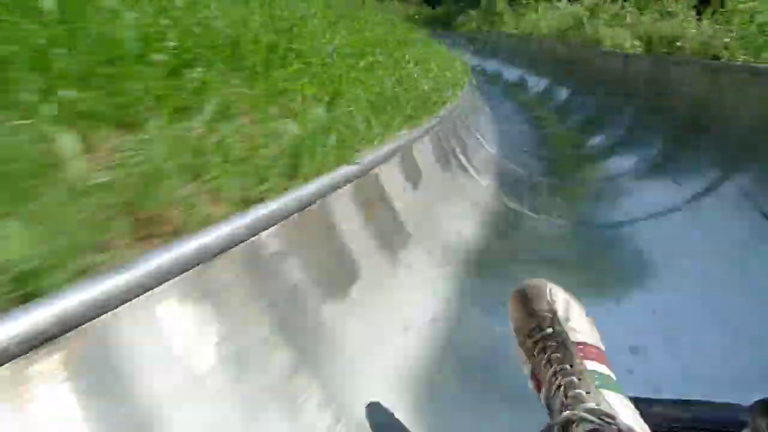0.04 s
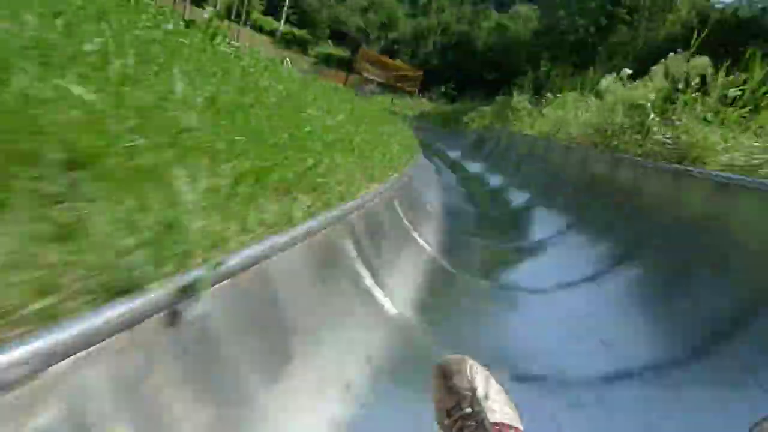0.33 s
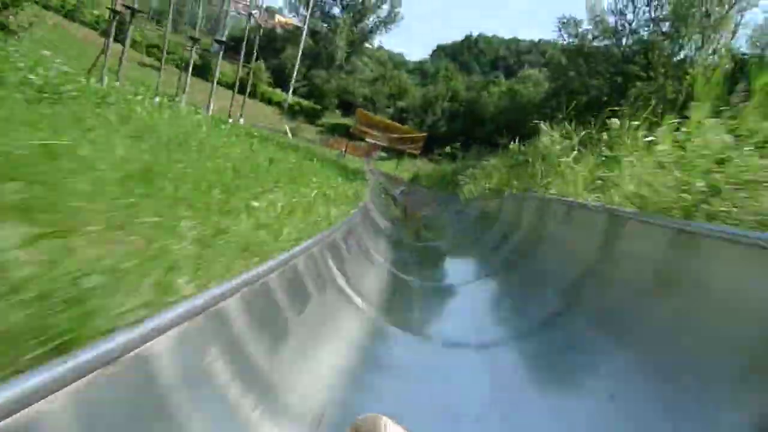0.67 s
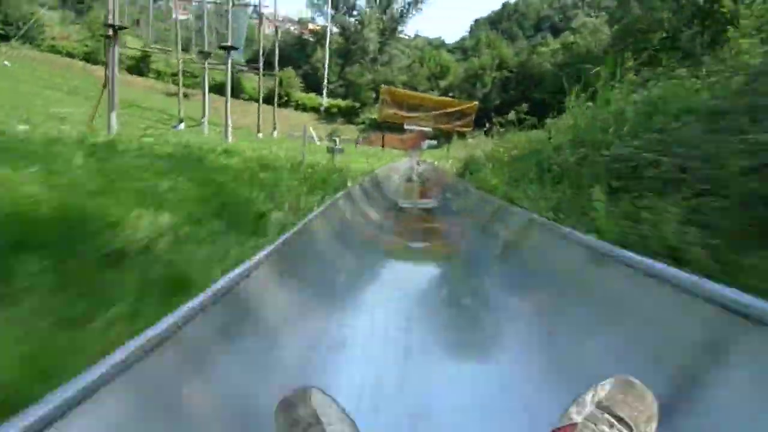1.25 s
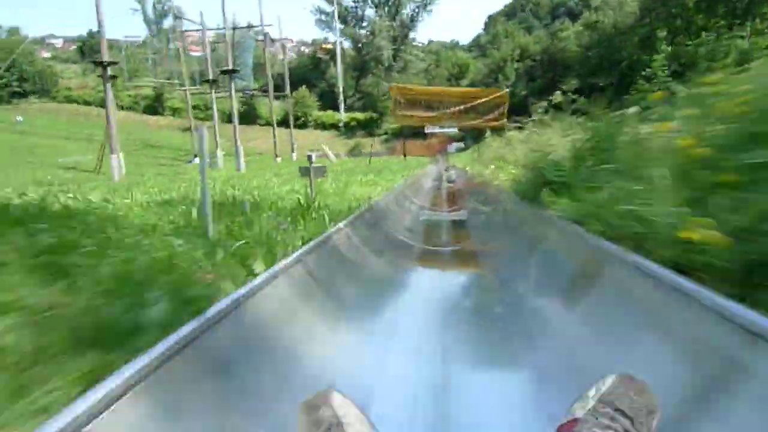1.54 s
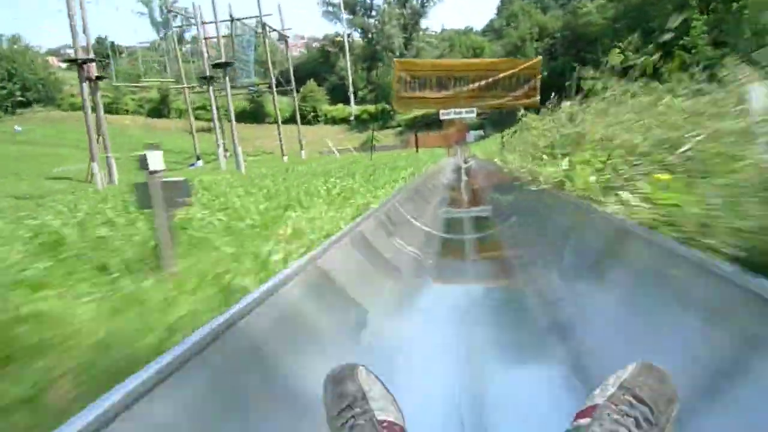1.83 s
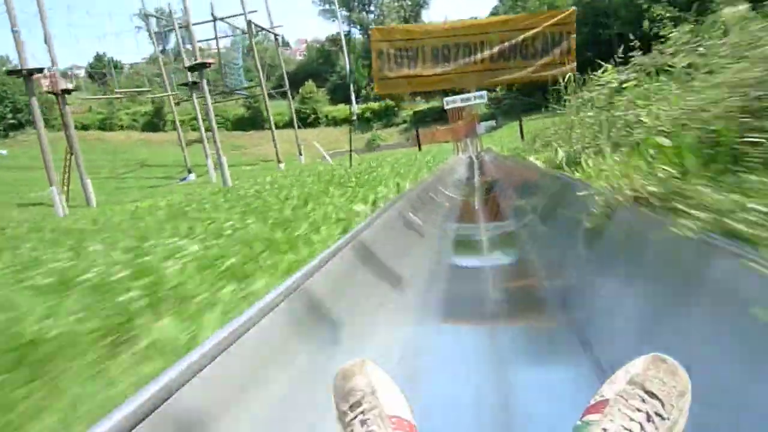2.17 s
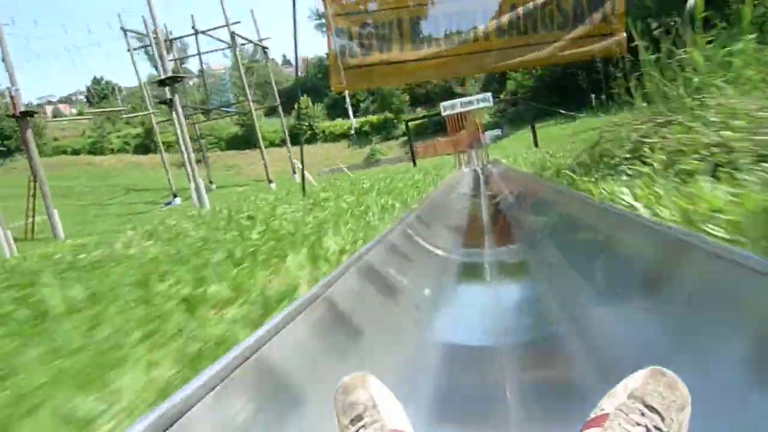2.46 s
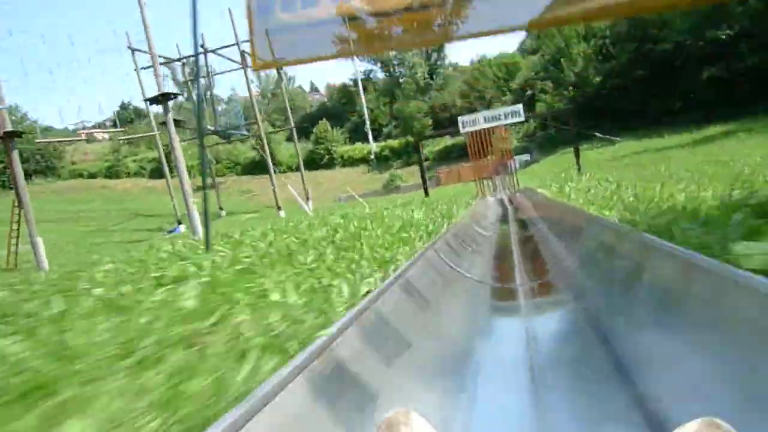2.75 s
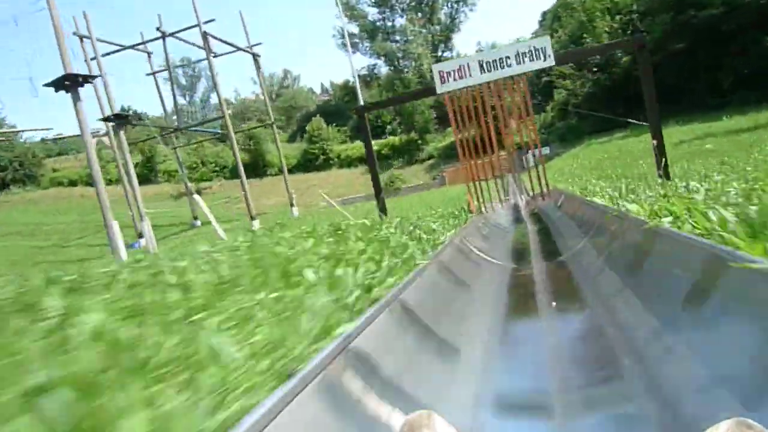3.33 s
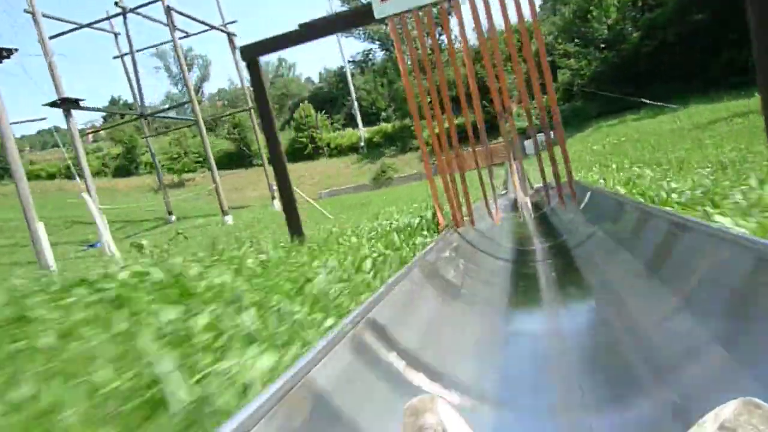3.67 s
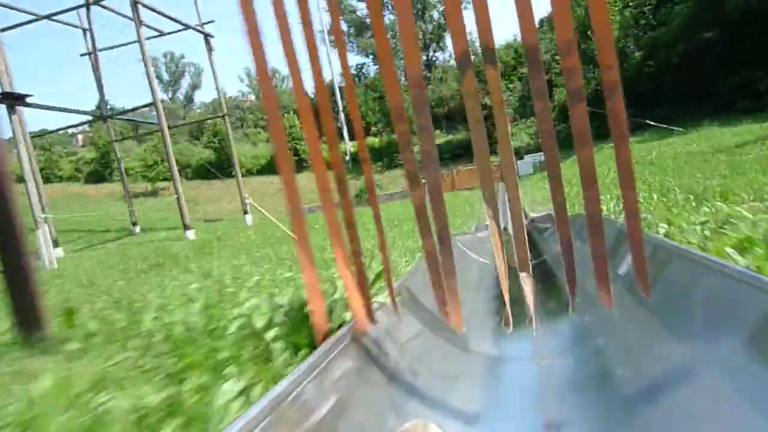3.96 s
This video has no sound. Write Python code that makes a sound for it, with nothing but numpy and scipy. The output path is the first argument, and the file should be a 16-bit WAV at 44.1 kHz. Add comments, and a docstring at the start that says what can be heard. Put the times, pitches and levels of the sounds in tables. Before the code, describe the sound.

A sled rolls along a metal track with a hollow rumble, bumping and clacking busily through a bend, then knocking over seams on the straight. The microphone rides along outdoors and catches low gusts of wind.

```python
"""Wheeled sled in a steel trough

Heard from the seat, the sled runs out of a bend and down the straight. The wheels rumble and set the
hollow shell droning, and the runners scrape. Bumps thump the shell, the chassis clacks against the wall,
and seams between the sheets give short rattling crashes. Wind buffets the microphone."""
import sys
import numpy as np
from scipy import signal
from scipy.fft import rfft, irfft, next_fast_len
from scipy.io import wavfile
from scipy.ndimage import map_coordinates

SR = 44100
rng = np.random.default_rng(int(sys.argv[2]) if len(sys.argv) > 2 else 0)


def output_pcm(signal):
    """Save a mono or channel-first signal as 16-bit PCM at the path in sys.argv[1].

    Samples are clipped to [-1, 1] before scaling.
    """
    pcm = np.clip(np.atleast_2d(signal).T, -1, 1) * 32767
    wavfile.write(sys.argv[1], SR, np.round(pcm).astype(np.int16))


N = 176400


def rolling():
    """Roughness drives shell and steel, pulsed once a turn by out-of-round wheels; the runners scrape."""
    # shell drone, wheel noise, runner scrape: time_s, level_db
    drone_levels = [(0, -34.5), (.14, -32.5), (.24, -32.5), (.49, -28), (.67, -28.5), (1.25, -29.5),
                    (1.41, -34.5), (1.58, -39), (1.68, -30), (1.83, -32), (2.02, -32), (2.16, -33.5),
                    (2.31, -31), (2.45, -35), (2.74, -35), (3.2, -36), (3.42, -37), (3.52, -32),
                    (3.66, -29.5), (4, -34)]
    wheel_levels = [(0.0, -42.5), (0.11, -45.5), (0.57, -38), (0.66, -35.5), (0.87, -39), (1.27, -37.5),
                    (1.45, -45), (1.68, -44), (1.83, -38), (2.02, -43), (2.47, -41.5), (2.65, -48.5),
                    (2.86, -46), (3.13, -43), (3.52, -45.5), (3.69, -39.5), (4.0, -42)]
    scrape_levels = [(0, -59.5), (.18, -60.5), (.4, -58.5), (.68, -59.5), (.95, -61), (1.2, -59.5),
                     (1.55, -64.5), (1.72, -63), (1.87, -56.5), (2.05, -64), (2.45, -64.5), (2.65, -71),
                     (3.3, -67), (3.7, -62.5), (4, -74)]
    # their spectra: freq_hz, relative_db
    shell_spectrum = [(40, -28.5), (120, -18), (180, -10), (222, -1.5), (245, -1.5), (272, 2), (310, -5.5),
                      (400, -6.5), (480, -10), (580, -16), (720, -23.5), (1400, -52.5), (3000, -85.5)]
    wheel_spectrum = [(150, -20), (450, 1), (650, 2), (1100, 1.5), (1500, -0.5), (2000, -3), (2500, -9),
                      (3100, -15.5), (3600, -24.5), (4300, -32), (5200, -38.5), (8000, -54)]
    scrape_spectrum = [(800, -28.5), (2200, -5.5), (2800, -4.5), (3200, -5), (3650, 0), (4200, -12),
                       (5200, -22.5), (8000, -46.5)]
    wheel_hz = 28 + 2.69 * wobble(4.1)
    turn = np.sin(2 * np.pi * np.cumsum(wheel_hz) / SR)
    load_db = 1.5 * wobble(45) + 0.52 * turn
    drone = unit(body(contacts(rate_hz=1500, spread_db=1.5), shell_spectrum))
    drone *= amp(curve(drone_levels) + 1.5 + load_db + 0.6 * wobble(14))
    grit = contacts(rate_hz=5000, spread_db=3)
    grit *= amp(curve(wheel_levels) - 0.5 + load_db + 2.2 * wobble(90))
    scrape = contacts(rate_hz=4000, spread_db=6) * amp(curve(scrape_levels) + 3.3 * wobble(56))
    return drone + steel(grit, wheel_spectrum, ring=1.0) + steel(scrape, scrape_spectrum, ring=0.58)


def thumps():
    """Each bump swings the shell for a few cycles, with a lower shove of the seat."""
    # bumps: start_s, level_db, pitch_hz
    bumps = [(.039, -15.5, 270), (.067, -15.5, 259), (.094, -11, 250), (0.108, -12.5, 258),
             (.251, -12, 275), (0.321, -18, 259), (0.331, -16, 270), (.478, -16.5, 255), (.546, -23, 260),
             (0.563, -13.5, 274), (0.574, -13.5, 260), (0.621, -20, 278), (0.645, -18, 250),
             (0.723, -17, 250), (0.751, -16.5, 230), (.764, -9, 210), (.881, -11, 248), (0.903, -18, 270),
             (.998, -14, 234), (1.011, -18.5, 253), (1.101, -15, 223), (1.172, -14.5, 229),
             (1.192, -18.5, 245), (1.299, -17, 262), (1.349, -13.5, 306), (1.448, -17, 248),
             (1.632, -12.5, 266), (1.651, -20, 261), (1.739, -17, 268), (1.822, -16.5, 270),
             (1.932, -8.5, 246), (2.226, -7.5, 255), (2.525, -11.5, 250), (2.552, -12, 384),
             (2.572, -19.5, 377), (2.631, -16.5, 244), (2.818, -21.5, 265), (2.919, -21, 250),
             (3.002, -21, 292), (3.128, -9.5, 245), (3.145, -14.5, 365), (3.243, -19, 279),
             (3.468, -16, 245), (3.492, -20.5, 274), (3.594, -19.5, 220), (3.832, -8.5, 272),
             (3.841, -11, 250), (3.856, -12.5, 334), (3.974, -20, 268), (3.989, -20, 260)]
    rise_s, decay_s = 0.0046, 0.0031
    seat_db, seat_hz = -17.5, 118
    t = np.arange(SR // 10) / SR
    attack = np.sin(np.pi / 2 * np.minimum(t / rise_s, 1)) ** 2
    release = np.exp(1 - np.hypot(1, np.maximum(t - rise_s, 0) / decay_s))
    out = np.zeros(N + SR)
    for (start_s, level_db, pitch_hz), phase in zip(bumps, rng.random((len(bumps), 2))):
        shell = np.sin(2 * np.pi * (pitch_hz * t + phase[0]))
        seat = amp(seat_db) * np.sin(2 * np.pi * (seat_hz * t + phase[1]))
        out[round(start_s * SR):][:len(t)] += amp(level_db) * attack * release * (shell + seat)
    return out[:N]


def clacks():
    """The chassis hits the wall: a hard strike and brief chatter ring it. Sharp steel ticks join in."""
    # wall hits, steel ticks: start_s, level_db
    hits = [(.094, -22.5), (0.109, -19), (.216, -24), (.257, -18.5), (.335, -23), (0.405, -24),
            (0.435, -20.5), (0.446, -27.5), (.477, -27), (.509, -22), (0.546, -33.5), (0.578, -24),
            (0.613, -30.5), (0.656, -22.5), (0.688, -21.5), (.768, -18.5), (0.8, -22), (0.888, -24.5),
            (0.999, -23.5), (1.073, -23), (1.108, -25), (1.179, -17.5), (1.245, -39.5), (1.351, -19),
            (1.46, -27.5), (1.721, -27.5), (1.937, -25), (1.971, -30), (2.171, -44), (2.234, -27.5),
            (2.556, -22.5), (3.123, -25.5), (3.15, -30), (3.492, -22), (3.603, -29.5), (3.824, -21),
            (3.845, -21)]
    ticks = [(.061, -32.5), (0.102, -38.5), (.371, -37.5), (.402, -43), (1.121, -35.5), (1.179, -30.5),
             (1.244, -42), (1.353, -37), (1.653, -49), (1.917, -35), (1.938, -41), (1.951, -39),
             (2.235, -37.5), (2.549, -47), (3.149, -40), (3.489, -40)]
    # their spectra: freq_hz, relative_db
    hit_spectrum = [(100, -23.5), (250, -3), (420, 4.5), (700, -8), (1000, -2), (1300, -1), (1600, -4.5),
                    (2200, -15), (3000, -25), (3700, -27.5), (5000, -41), (8000, -60.5)]
    tick_spectrum = [(400, -13.5), (1200, 4.5), (2400, -3), (3000, -2), (3700, 1), (4600, -14.5),
                     (6000, -27.5), (8500, -44)]
    strike_db, chatter_db = 16.5, -4.5
    chatter = sum(amp(db + chatter_db) * burst(s, hold_s=0.002, rise_s=0.0016, decay_s=0.0066)
                  for s, db in hits)
    chatter *= contacts(rate_hz=6000, spread_db=1.5)
    strike = np.zeros(N)
    for start_s, level_db in hits:
        strike[round((start_s + 0.001) * SR)] = amp(level_db + strike_db)
    tick = sum(amp(db) * burst(s, hold_s=0.0026, rise_s=0.002, decay_s=0.0042) for s, db in ticks)
    tick *= rng.standard_normal(N)
    return steel(strike + chatter, hit_spectrum, ring=1.6) + steel(tick, tick_spectrum, ring=1.0)


def seams():
    """A seam rattles the sled for as long as the wheels take to cross."""
    # seam crossings: start_s, length_s, level_db
    crossings = [(0.048, 0.075, -32.5), (1.104, 0.017, -27.5), (1.176, 0.017, -32.5), (1.347, 0.023, -32.5),
                 (1.449, 0.032, -33.5), (1.638, 0.039, -33.5), (1.933, 0.01, -31.5), (2.235, 0.017, -35.5),
                 (2.533, 0.03, -22), (2.644, 0.027, -32.5), (3.13, 0.024, -24), (3.24, 0.024, -37),
                 (3.474, 0.041, -27.5), (3.817, 0.045, -26)]
    # rattle spectrum: freq_hz, relative_db
    spectrum = [(60, -16.5), (150, -10.5), (260, -4.5), (400, 4), (720, -8), (1100, -8), (1600, -14),
                (2200, -14.5), (3000, -24.5), (3600, -28.5), (4600, -41.5), (5600, -55.5), (8500, -66.5)]
    shake = sum(amp(level_db) * burst(start_s, length_s, rise_s=0.005, decay_s=0.012)
                for start_s, length_s, level_db in crossings)
    return steel(shake * contacts(rate_hz=2000, spread_db=1.0), spectrum, ring=0.7)


def steel(x, spectrum, ring):
    """Sled and trough resonate; the bend's modes crossfade to the straight's."""
    # resonances: centre_hz, width_hz, lift_db (at ring = 1)
    bend_modes = [(600, 150, 5.5), (838, 27, 5.5), (946, 30, -1.5), (1093, 47, 2.5), (1279, 45, 4.5),
                  (1597, 39, 4.5), (1840, 100, 0), (2020, 50, 2), (2336, 77, 4.5), (2630, 70, 3.5),
                  (3520, 130, 6.5), (3610, 81, -2)]
    straight_modes = [(440, 94, 6), (862, 57, -0.5), (960, 30, -4.5), (1143, 79, 3.5), (1370, 39, 3.5),
                      (1630, 54, 1), (1825, 70, 1.5), (2028, 44, 5.5), (2260, 70, 2.5), (2380, 120, -5),
                      (2700, 58, 7), (2920, 60, -3.5), (3400, 60, 0)]
    bend_exit_s, fade_s = 2.47, 0.31
    straight = np.clip((clock() - bend_exit_s) / fade_s + 0.5, 0, 1)
    in_bend = body(x * (1 - straight), spectrum, bend_modes, ring)
    return in_bend + body(x * straight, spectrum, straight_modes, ring)


def trough(blows):
    """The steel sheets ring on faintly after each blow."""
    tail_db, decay_s = -17.5, 0.097
    t = np.arange(SR // 2) / SR
    tail = rng.standard_normal(len(t)) * np.exp(-t / decay_s)
    return blows + amp(tail_db) * signal.fftconvolve(blows, tail / np.linalg.norm(tail))[:N]


def wind():
    """Low lumps of air buffet the microphone."""
    # gusts: time_s, level_db
    gusts = [(0, -40.5), (.45, -48.5), (.77, -39.5), (.9, -46), (1.1, -35), (1.5, -43), (1.75, -36.5),
             (2.2, -41), (2.8, -45), (3.4, -45.5), (3.6, -35), (3.72, -47), (3.84, -40.5), (4, -40)]
    # buffet spectrum: freq_hz, relative_db
    spectrum = [(10, -4.5), (28, -12.5), (55, -0.5), (90, 3), (150, 1.5), (300, -15), (1000, -53)]
    buffet = unit(body(rng.standard_normal(N), spectrum))
    return buffet * amp(curve(gusts) + 2.8 * wobble(18))


def body(x, spectrum, modes=(), ring=0):
    """Causal filter of unit energy; ring scales the modes' lift."""
    size = next_fast_len(N + SR // 4)
    hz = np.fft.rfftfreq(size, 1 / SR)
    freq_hz, relative_db = np.transpose(spectrum)
    gain_db = np.interp(np.log(hz + 1), np.log(freq_hz + 1), relative_db)
    gain_db += ring * sum(lift_db / (1 + (2 * (hz - centre_hz) / width_hz) ** 2)
                          for centre_hz, width_hz, lift_db in modes)
    cepstrum = irfft(np.log(unit(amp(gain_db))), size)
    cepstrum[1:size // 2] *= 2  # fold to minimum phase
    cepstrum[size // 2 + 1:] = 0
    return irfft(rfft(x, size) * np.exp(rfft(cepstrum)), size)[:N]


def contacts(rate_hz, spread_db):
    """Random tiny impacts of uneven size, rms 1."""
    hit = rng.random(N) < rate_hz / SR
    sign = rng.choice([-1, 1], N)
    strength = amp(spread_db * np.clip(rng.standard_normal(N), -2, 2))
    return unit(hit * sign * strength)


def burst(start_s, hold_s, rise_s, decay_s):
    """Linear attack; exponential decay from hold_s after the start."""
    t = clock() - start_s
    return np.clip(t / rise_s, 0, 1) * np.exp(-np.maximum(t - hold_s, 0) / decay_s)


def wobble(rate_hz):
    """Smooth random curve, rate_hz knots a second."""
    knots = rng.standard_normal(int(N * rate_hz / SR) + 4)
    return map_coordinates(knots, [clock() * rate_hz])


def curve(rows):
    """Points (time_s, value) joined by lines."""
    return np.interp(clock(), *np.transpose(rows))


def clock():
    """Seconds at each sample."""
    return np.arange(N) / SR


def amp(db):
    """Decibels to gain."""
    return 10 ** (np.asarray(db) / 20)


def unit(x):
    """Scale to rms 1."""
    return x / np.sqrt(np.mean(x ** 2) + 1e-20)


def scene():
    """Sled and wind, mono."""
    return (rolling() + trough(thumps() + clacks() + seams()) + wind())[None]


def record(dry):
    """Rounded peaks, faint hiss, steep low-pass."""
    ceiling, hiss_db, cutoff_hz = 0.27, -63.5, 7950
    rounded = dry / (1 + np.abs(dry / ceiling) ** 6) ** (1 / 6)
    hiss = amp(hiss_db) * rng.standard_normal(dry.shape)
    size = next_fast_len(N + SR // 2)
    lowpass = 1 / np.sqrt(1 + (np.fft.rfftfreq(size, 1 / SR) / cutoff_hz) ** 56)
    return irfft(rfft(rounded + hiss, size) * lowpass, size)[..., :N]


dry = scene()
out = record(dry)
output_pcm(out)
```